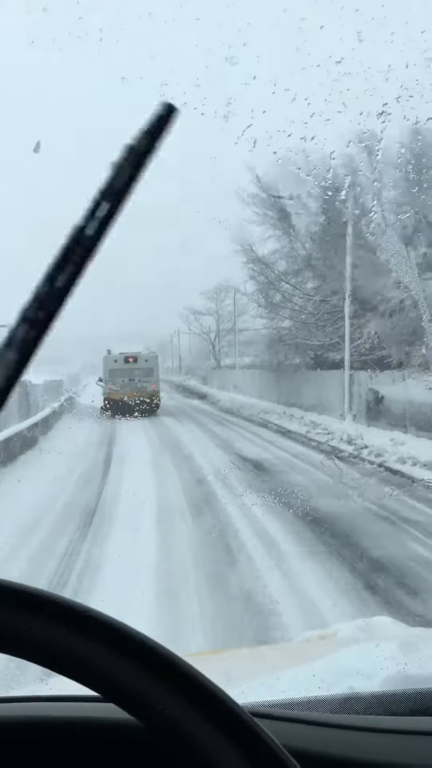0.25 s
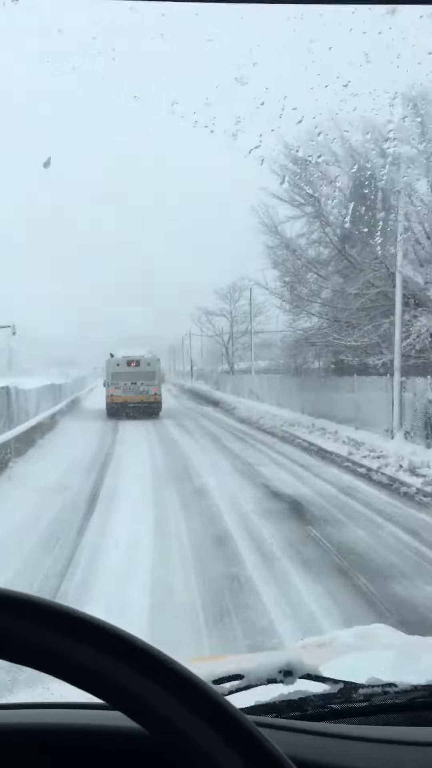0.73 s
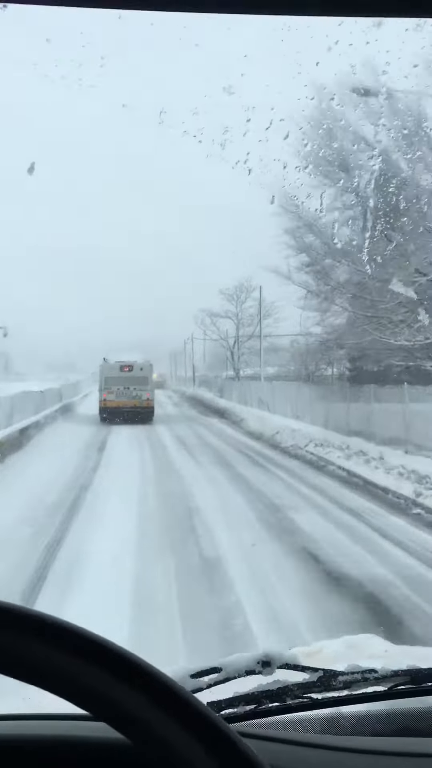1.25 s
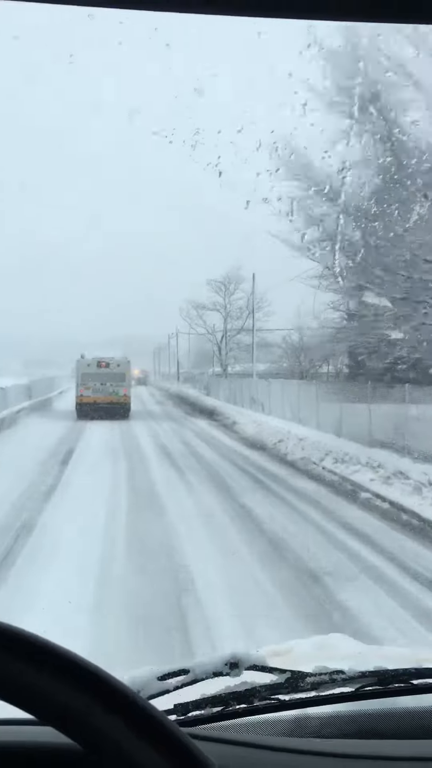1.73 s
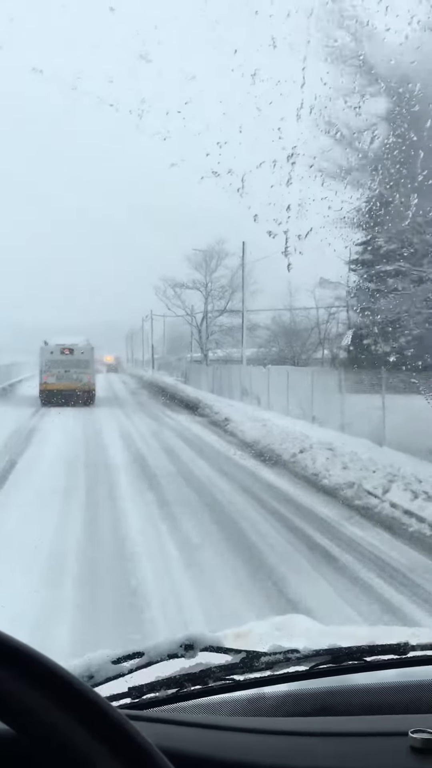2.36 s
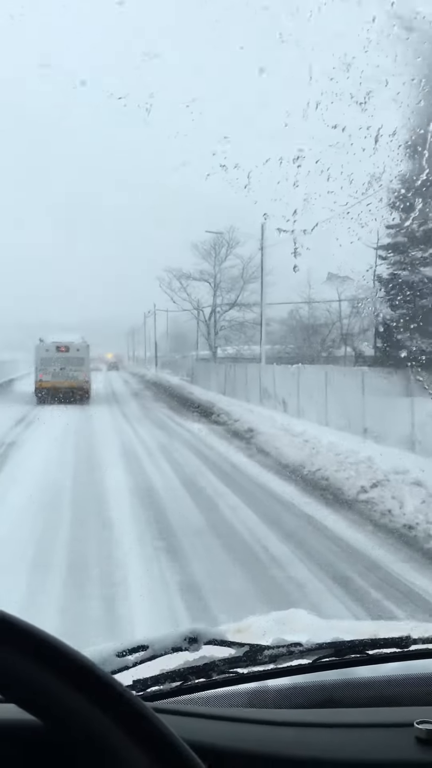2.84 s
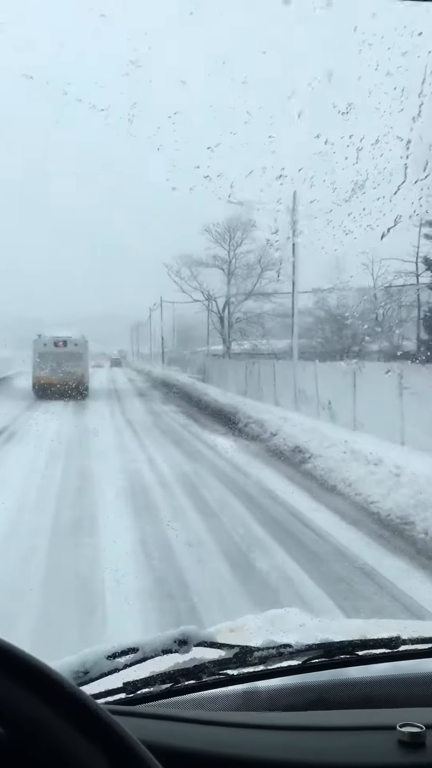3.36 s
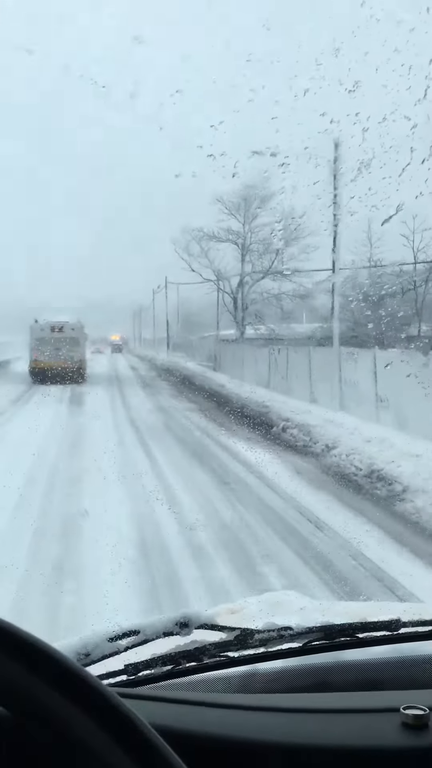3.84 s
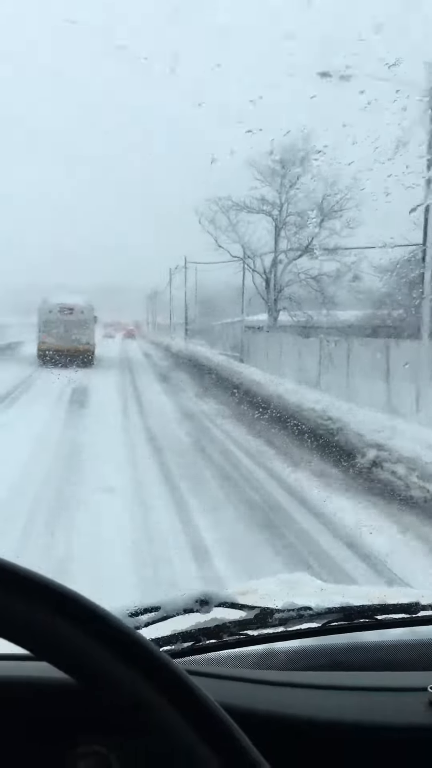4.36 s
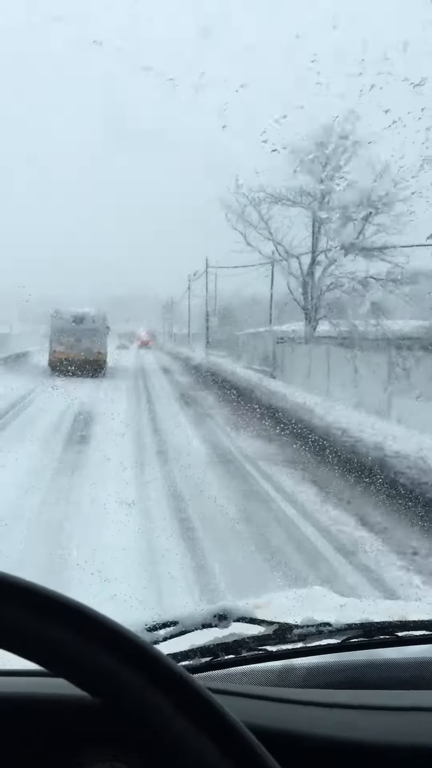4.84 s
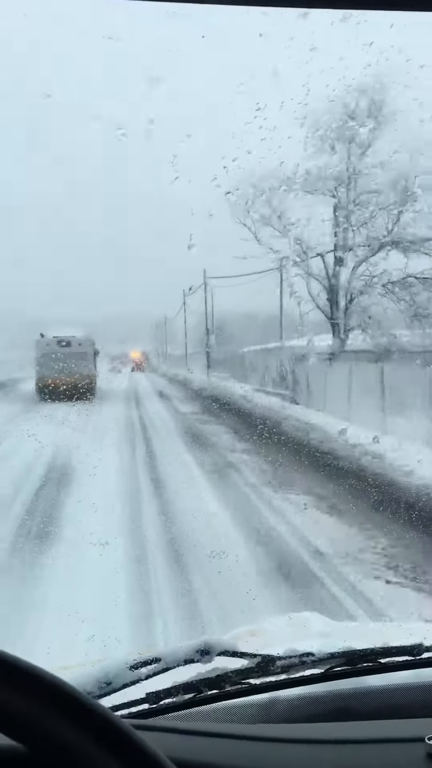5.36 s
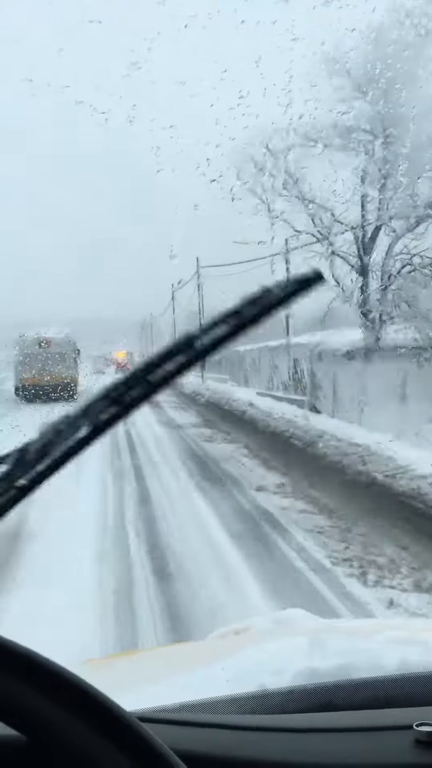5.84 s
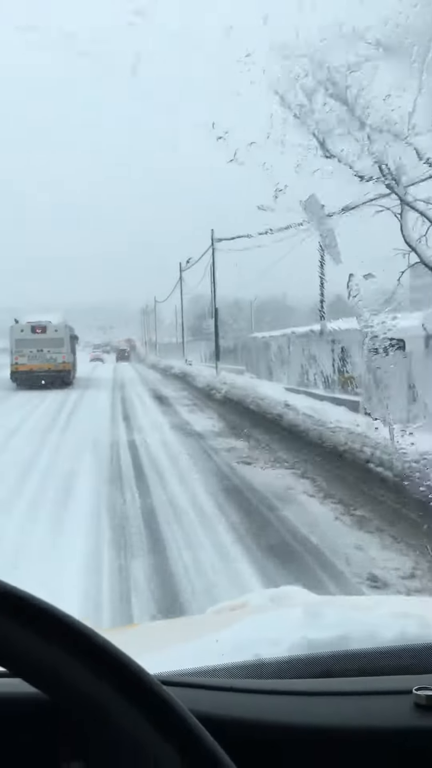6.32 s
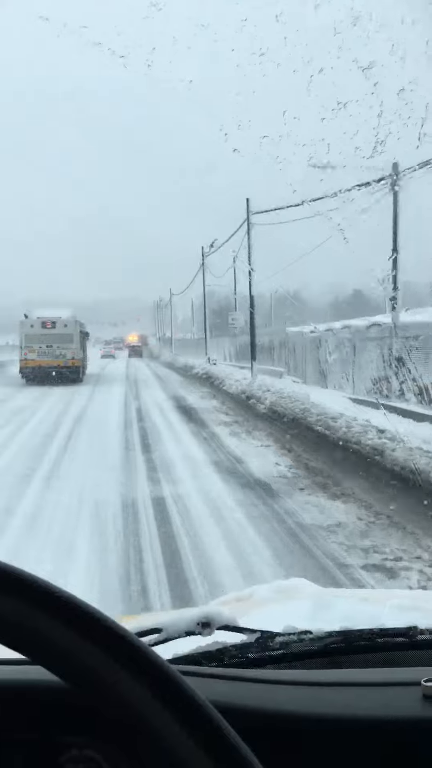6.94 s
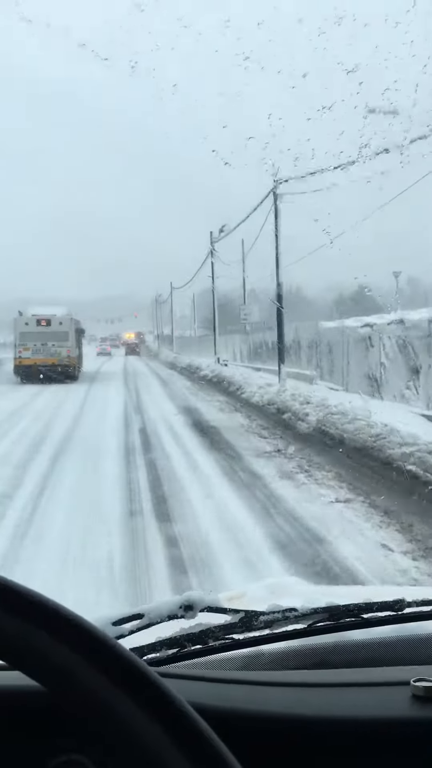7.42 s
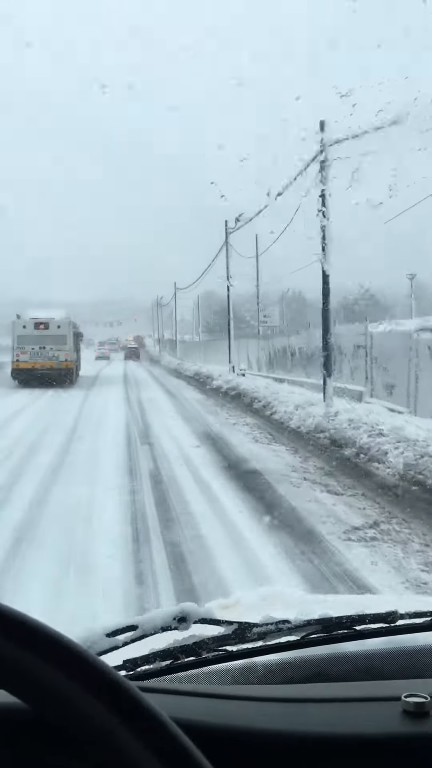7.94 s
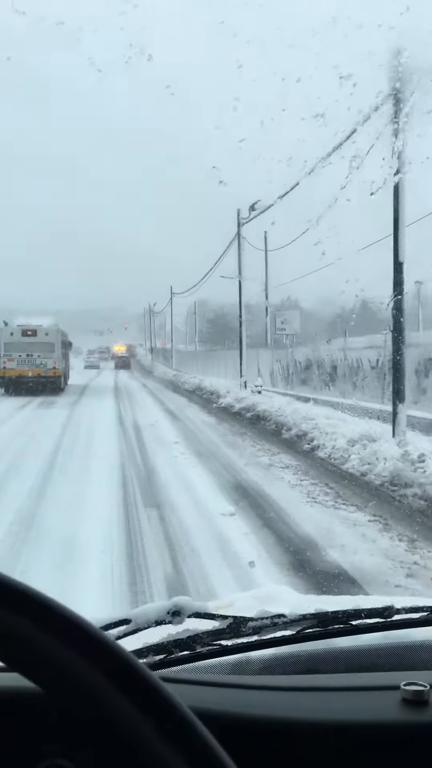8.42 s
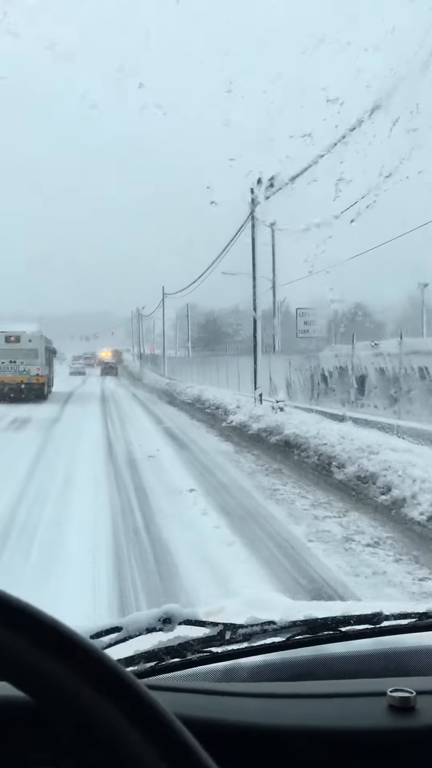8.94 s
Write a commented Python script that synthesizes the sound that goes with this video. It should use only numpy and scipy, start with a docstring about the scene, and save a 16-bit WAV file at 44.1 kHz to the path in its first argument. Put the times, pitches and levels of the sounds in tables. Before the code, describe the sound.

Close, enclosed mono cabin sound: low engine drone, rolling rumble over snow ruts, gentle intake hiss and vent air. A faint wiper stroke opens. Engine pitch rises gradually, with a thin whistling tone near the middle, then lowers as the car coasts. Wiper swishes and soft underfloor thumps crowd the later part before a couple of thuds and a renewed low hum.

```python
"""Six-cylinder car on a snowy road, cabin

The engine booms as a sine at its firing rate, joined by sine orders that cabin and panel resonances lift.
It pulls a little, coasts and picks up again. Shaped noise makes the tyre rumble, intake air and heater.
Narrow noise bands and a sine whistle with the intake; the drive line whines while coasting.
The wipers make strokes of swish and motor noise; damped noise bursts make trim ticks and dull thuds."""
import sys
import numpy as np
from scipy import signal
from scipy.fft import rfft, irfft, next_fast_len
from scipy.io import wavfile
from scipy.ndimage import uniform_filter1d

SR = 44100
rng = np.random.default_rng(int(sys.argv[2]) if len(sys.argv) > 2 else 0)


def generate_wav(signal):
    """Clip the signal to [-1, 1] and save it as 16-bit WAV at the path in sys.argv[1]."""
    frames = np.transpose(np.atleast_2d(signal))
    scaled = np.clip(frames, -1, 1) * 32767
    pcm = np.round(scaled).astype(np.int16)
    wavfile.write(sys.argv[1], SR, pcm)


N = 404838
TIME_S = np.arange(N) / SR
FREQ_HZ = np.maximum(np.arange(N // 2 + 1) * SR / N, 1)

# engine speed, also road speed in one gear: time_s, firing_hz
SPEED = [(0, 69.5), (1.3, 71.5), (2.1, 72.5), (3.1, 75.4), (4.6, 79.6), (5.25, 80.7), (6.1, 79.6),
         (7, 77.9), (8.05, 74.1), (8.6, 74.1), (9.18, 75.1)]
# driver pulls, coasts, picks up: time_s, boom_db, hiss_db
PEDAL = [(0, -17, -50.5), (1.2, -18, -48.5), (2.4, -18.5, -49), (3.2, -17, -48), (3.7, -14.5, -48.5),
         (4.5, -16, -47), (4.72, -17.5, -47.5), (4.88, -12.5, -46.5), (5.05, -16, -47.5),
         (5.35, -16.5, -47), (5.55, -21.5, -50), (6.15, -23.5, -52.5), (6.32, -30, -53.5),
         (6.45, -23, -53.5), (6.8, -24, -54.5), (7.3, -29.5, -59), (7.95, -32, -57.5), (8.3, -22, -55),
         (8.8, -19, -50.5), (9.18, -18.5, -47.5)]
CRUISE_HZ, CRUISE_BOOM_DB, CRUISE_HISS_DB = 75, -18, -49

# engine orders before resonance lift: order (multiple of the six-firing cycle), level_db, boom_share (dB per dB)
ENGINE_ORDERS = [(2, -47, .5), (3, -44, .4), (7, -37, .3), (8, -38, .4), (9, -34, -.4), (10, -46, .1),
                 (11, -45.5, -.1), (12, -46.5, -.35), (13, -57, -.3), (14, -56, .3), (15, -52, .1),
                 (17, -58.5, .3), (18, -52.5, 0), (20, -57, .4), (21, -56, .3), (22, -53, .7),
                 (23, -56.5, -.15), (24, -58, -.1), (27, -59.5, .5), (30, -60, .4), (32, -59, .5),
                 (34, -59, .7), (38, -59.5, .3), (42, -63, .1), (46, -64, .3), (48, -61.5, .4),
                 (57, -63, .2), (63, -64, .3), (65, -63, .3), (71, -65, .4), (80, -69, 0)]
ORDER_WAVER_DB, ORDER_WAVER_TURNS = 1.3, .04
# cabin air modes: centre_hz, width_hz, peak_db
CABIN_MODES = [(127, 8, 7), (157, 12, 4), (177, 10, 9), (200, 14, 12), (211, 10, 10), (282, 30, 7)]
# body panel resonances: centre_hz, width_hz, peak_db
PANEL_MODES = [(352.5, 23, 3.5), (416, 17, 4.5), (552, 16, 5), (738, 60, 2.5), (856, 31, 6),
               (1062, 27, 6.5), (1420, 170, 3)]
# valve and belt clatter spectrum: freq_hz, relative_db
CLATTER_COLOUR = [(200, -13), (320, -2), (450, -8), (620, -1.5), (850, 0.5), (960, -4), (1400, -7),
                  (2200, -16.5), (4000, -22)]
CLATTER_DB, CLATTER_DB_PER_BOOM_DB = -47, 0.24

# body rumble spectrum: freq_hz, relative_db
RUMBLE_COLOUR = [(12, -28), (22, -15), (30, -16.5), (42, 1.5), (58, -5), (75, -6.5), (100, -16.5),
                 (160, -41)]
# body drone spectrum: freq_hz, relative_db
DRONE_COLOUR = [(50, -6), (80, 5), (112, -1.5), (135, -3.5), (165, -26), (220, -30.5), (350, -53)]
# snow churning in the wheel wells, spectrum: freq_hz, relative_db
CHURN_COLOUR = [(120, 5.5), (175, -4.5), (240, -3), (290, -2), (340, -10.5), (450, -22.5), (800, -36)]
# tread roar spectrum before the panels: freq_hz, relative_db
TYRE_COLOUR = [(200, 0), (330, -0.5), (480, 2), (600, -1), (800, -0.5), (950, -4.5), (1200, -5.5),
               (1600, -11), (2200, -12.5), (3000, -25), (7000, -40)]
# levels at cruise outside ruts; slopes per Hz of firing rate
RUMBLE_DB, RUMBLE_DB_PER_HZ = -35, 0.63
DRONE_DB, DRONE_DB_PER_HZ = -31, .5
CHURN_DB, ROAR_DB, ROAR_DB_PER_BOOM_DB = -38, -42.5, 0.19
# snow ruts and ridges: start_s, length_s, rumble_db, drone_db, churn_db
RUTS = [(0, 0.42, -35, -31, -38.5), (.87, 0.13, -26, -40, -37), (1.1, 0.11, -28, -27, -44),
        (2.6, 0.37, -47, -47, -33), (3.6, 0.28, -25, -34, -55), (4.03, 0.33, -24, -35, -42),
        (4.76, 0.17, -27.5, -21.5, -45), (5.12, 0.26, -24, -25, -52), (5.6, 0.14, -40, -28, -37),
        (6.95, 0.25, -46, -31, -38), (7.84, 0.36, -36, -29.5, -51)]
RUT_ATTACK_S, RUT_RELEASE_S = 0.019, 0.06

# intake hiss spectrum: freq_hz, relative_db
HISS_COLOUR = [(800, -15), (1400, 2.5), (2000, 0.5), (2950, -5), (3450, 0), (4100, 0.5), (4700, -0.5),
               (5400, -6), (5800, -8), (7200, -10), (8000, -15.5), (8700, -15.5), (10000, -20),
               (11000, -21.5)]
# duct rings: centre_hz, width_hz, relative_db, rise_db_per_hz (of firing rate)
AIR_RINGS = [(2778, 25, -17.5, -.15), (4035, 100, -13, -.3), (4865, 40, -19, .1), (5090, 60, -21, -.6),
             (5480, 50, -19.5, -.7)]
# rush level before its speed window; window centre and width in firing rate
RUSH_DB, RUSH_DB_PER_HISS_DB, RUSH_AT_HZ, RUSH_RANGE_HZ = -56, 4.1, 73.5, 5.2
# thin edge tone: time_s, pitch_hz, level_db
WHISTLE = [(.4, 10150, -83), (1.15, 10600, -83), (1.3, 10760, -73), (1.65, 10800, -74), (2, 10520, -82),
           (2.6, 10650, -81), (2.85, 11100, -71), (3.2, 11650, -74), (3.6, 12050, -80), (4.3, 12550, -79),
           (5.1, 12720, -78), (5.42, 12250, -83), (5.6, 11880, -74), (6.1, 10900, -80), (6.5, 10400, -100)]
WHISTLE_WIDTH_HZ = 170
# singing tone: start_s, length_s, level_db
SING_SPELLS = [(4.7, 1.66, -63), (4.74, .19, -55), (4.97, .48, -63), (5.52, .25, -68), (5.67, .055, -55),
               (5.94, .1, -65), (6.19, .065, -57)]
SING_HZ, SING_HZ_PER_HZ = 3700, 26.5  # pitch at cruise; slope per Hz of firing rate
SING_ATTACK_S, SING_RELEASE_S = 0.037, 0.028

# heater vent spectrum: freq_hz, relative_db
VENT_COLOUR = [(1200, -11), (2200, -6.5), (3000, -5), (3600, -2), (4100, -2), (5000, -12), (5700, -8),
               (6200, -7.5), (7000, -16), (7800, -18), (9600, -17.5), (10500, -24.5), (12000, -20),
               (15500, -20)]
# wiper strokes: start_s, length_s, blade_db, motor_db
WIPES = [(0.041, 0.78, -67, -56), (5.5, 0.42, -51, -71), (6.301, 0.575, -53, -52)]
WIPER_HZ, WIPER_RISE_HZ_PER_S, WIPER_WIDTH_HZ = 682, 90, 45
# wiper arms and slush under the floor: time_s, level_db, centre_hz, width_hz, t60_s
THUDS = [(.62, -39, 230, 140, .35), (5.195, -33, 270, 100, .18), (5.585, -30, 210, 110, .2),
         (5.65, -31, 300, 160, .18), (5.712, -29, 340, 190, .15), (5.755, -31, 250, 110, .18),
         (6.085, -30, 250, 120, .16), (6.228, -26, 250, 140, .16), (6.312, -37, 480, 700, .13),
         (6.33, -30, 215, 80, .2), (6.67, -32, 200, 140, .15), (6.77, -35.5, 370, 120, .25),
         (6.80, -41, 560, 300, .15), (6.825, -33, 360, 100, .18), (6.922, -24, 230, 120, .16),
         (7.055, -32, 300, 130, .14), (7.475, -39, 360, 90, .2), (8.06, -27, 150, 120, .3),
         (8.095, -33, 270, 120, .25)]
# trim ticks: time_s, level_db, centre_hz, width_hz, t60_s
TICKS = [(3.135, -58, 9000, 2500, .08), (3.6025, -29, 2000, 3900, .045), (3.609, -37, 1100, 2200, .08),
         (5.180, -46.5, 8000, 7500, .14), (5.684, -46, 6500, 1500, .12), (7.307, -56, 9000, 2000, .11),
         (7.41, -59, 10500, 5000, .15), (8.066, -47.5, 12000, 5000, .12)]
# drive-line whine: order (multiple of the six-firing cycle), level_db at full coast
GEAR_LINES = [(21.5, -48.5), (58, -58.5), (65.6, -53.5), (71.9, -56.5)]
GEAR_WIDTH_HZ = 9
TOP_HZ = 15750


def undb(db):
    """Decibels to gain."""
    return 10 ** (np.asarray(db) / 20)


def unit(x):
    """Scale to rms 1."""
    return x / np.sqrt(np.mean(x ** 2))


def curves(table):
    """Interpolate each column of timed rows at every sample."""
    time_s, *columns = np.transpose(table)
    return [np.interp(TIME_S, time_s, column) for column in columns]


def swells(table, attack_s, release_s):
    """Rows (start, length, dB, ..) rise, hold and fade; one summed gain curve per dB column."""
    start_s, length_s, *levels_db = np.transpose(table)
    shapes = []
    for start, length in zip(start_s, length_s):
        corners_s = np.cumsum([start, attack_s, max(length - attack_s, 0), release_s])
        shapes.append(np.interp(TIME_S, corners_s, [0, 1, 1, 0]))
    return [undb(db) @ np.array(shapes) for db in levels_db]


def walk(rate_hz):
    """Random wander, spread near 1, linear between rate_hz points per second."""
    steps = rng.standard_normal(1024)
    return 1.6 * np.interp(TIME_S * rate_hz, np.arange(len(steps)), steps)


def bell(hz, centre_hz, width_hz):
    """Resonance curve, 1 at its centre."""
    return 1 / (1 + (2 * (hz - centre_hz) / width_hz) ** 2)


def colour(points):
    """Gain of a spectrum of (Hz, dB) points, rolled off beyond both ends."""
    hz, db = np.transpose(points)
    gain = undb(np.interp(np.log(FREQ_HZ), np.log(hz), db))
    return gain * np.minimum(FREQ_HZ / hz[0], 1) * np.minimum(hz[-1] / FREQ_HZ, 1) ** 2


def panels():
    """Body panel gain per frequency."""
    return undb(sum(db * bell(FREQ_HZ, hz, width_hz) for hz, width_hz, db in PANEL_MODES))


def shape(x, gain):
    """Filter by a gain per FREQ_HZ; rms 1."""
    size = next_fast_len(N, True)
    bins_hz = np.arange(size // 2 + 1) * SR / size
    return unit(irfft(rfft(x, size) * np.interp(bins_hz, FREQ_HZ, gain), size)[:N])


def noise(gain):
    """Noise of rms 1 with the given gain per frequency."""
    return shape(rng.standard_normal(N), gain)


def even(x, size=SR // 8):
    """Take out slow chance swells; quick flutter stays."""
    power = uniform_filter1d(uniform_filter1d(x ** 2, size), size)
    return x / np.sqrt(power)


def tone(hz):
    """Sine of rms 1 on a moving pitch."""
    return np.sqrt(2) * np.sin(2 * np.pi * np.cumsum(hz) / SR)


def airy(hz, width_hz):
    """Narrow noise band on a moving pitch."""
    return noise(bell(FREQ_HZ, 0, width_hz)) * tone(hz)


def engine(phase, firing_hz, boom_db):
    """Firing rate booms; unequal cylinders add orders that swell on crossing cabin and panel modes."""
    load_db = boom_db - CRUISE_BOOM_DB
    rates_hz = np.linspace(firing_hz.min(), firing_hz.max(), 64)
    out = undb(boom_db + 0.35 * walk(19)) * np.sin(2 * np.pi * phase)
    for order, db, boom_share in ENGINE_ORDERS:
        ratio = order / 6
        lift_db = sum(peak_db * bell(ratio * rates_hz, hz, width_hz)
                      for hz, width_hz, peak_db in CABIN_MODES + PANEL_MODES)
        turns = ratio * phase + rng.random() + ORDER_WAVER_TURNS * walk(11)
        level_db = db + np.interp(firing_hz, rates_hz, lift_db) + boom_share * load_db
        level_db = level_db + ORDER_WAVER_DB * walk(8)
        out = out + undb(level_db) * np.sin(2 * np.pi * turns)
    return np.sqrt(2) * out


def clatter(phase, boom_db):
    """Valves and belts repeat a slowly changing noise pattern every six firings."""
    cycle = phase / 6 % 1
    patterns = rng.standard_normal((3, 2048))
    out = sum(walk(0.99) * np.interp(cycle, np.linspace(0, 1, len(p)), p) for p in patterns)
    out = out / np.sqrt(uniform_filter1d(out ** 2, size=8000))
    level_db = CLATTER_DB + CLATTER_DB_PER_BOOM_DB * (boom_db - CRUISE_BOOM_DB)
    return shape(out, colour(CLATTER_COLOUR) * panels()) * undb(level_db)


def road(firing_hz, boom_db):
    """Body rumbles and drones with speed and ruts, snow churns, treads roar through the panels."""
    faster_hz = firing_hz - CRUISE_HZ
    jolt, shudder, spray = swells(RUTS, RUT_ATTACK_S, RUT_RELEASE_S)
    rumble_gain = np.hypot(undb(RUMBLE_DB + RUMBLE_DB_PER_HZ * faster_hz), jolt)
    rumble = even(noise(colour(RUMBLE_COLOUR))) * rumble_gain
    drone_gain = np.hypot(undb(DRONE_DB + DRONE_DB_PER_HZ * faster_hz), shudder)
    drone = even(noise(colour(DRONE_COLOUR))) * drone_gain
    churn = even(noise(colour(CHURN_COLOUR))) * np.hypot(undb(CHURN_DB), spray)
    roar_db = ROAR_DB + ROAR_DB_PER_BOOM_DB * (boom_db - CRUISE_BOOM_DB) + .8 * walk(16)
    roar = even(noise(colour(TYRE_COLOUR) * panels())) * undb(roar_db)
    return rumble + drone + churn + roar


def intake(phase, firing_hz, hiss_db):
    """Throttle air hisses, pulsing at the firing rate, and rings in ducts; a rush peaks at one engine speed."""
    pulsing = 1 + 0.11 * np.cos(2 * np.pi * phase)
    flutter = undb(.8 * walk(25))
    hiss = noise(colour(HISS_COLOUR)) * pulsing * undb(-0.5)
    rings = 0
    for hz, width_hz, db, rise_db_per_hz in AIR_RINGS:
        ring_db = db + rise_db_per_hz * (firing_hz - CRUISE_HZ) + walk(20)
        rings = rings + airy(hz * (1 + .002 * walk(3)), width_hz) * undb(ring_db)
    rush_db = RUSH_DB + RUSH_DB_PER_HISS_DB * (hiss_db - CRUISE_HISS_DB) + 1.5 * walk(16)
    rush = noise(bell(FREQ_HZ, 4950, 1100) ** 2) * undb(rush_db)
    rush = rush * bell(firing_hz, RUSH_AT_HZ, RUSH_RANGE_HZ)
    return flutter * ((hiss + rings) * undb(hiss_db) + rush)


def whistles(firing_hz):
    """An airy edge tone glides in pitch; a lower sine sings in spells, its pitch tied to engine speed."""
    hz, db = curves(WHISTLE)
    edge_tone = airy(hz, WHISTLE_WIDTH_HZ) * undb(db)
    spells, = swells(SING_SPELLS, SING_ATTACK_S, SING_RELEASE_S)
    sing_hz = SING_HZ + SING_HZ_PER_HZ * (firing_hz - CRUISE_HZ) + 12 * walk(110)
    return edge_tone + tone(sing_hz) * spells * undb(1.5 * walk(40))


def heater():
    """Demister air: coloured noise, nearly steady."""
    return noise(colour(VENT_COLOUR)) * undb(-53.0 + 0.36 * walk(21))


def wipers():
    """Blades swish over wet glass; motor bands an octave apart rise in pitch from each stroke's start."""
    blade, motor = swells(WIPES, attack_s=0.19, release_s=0.079)
    starts_s = np.array(WIPES)[:, 0]
    stroke = np.maximum(np.searchsorted(starts_s, TIME_S) - 1, 0)
    hz = WIPER_HZ + WIPER_RISE_HZ_PER_S * (TIME_S - starts_s[stroke])
    whir = airy(hz, WIPER_WIDTH_HZ) + undb(2.5) * airy(hz / 2, WIPER_WIDTH_HZ / 2)
    return blade * noise(bell(FREQ_HZ, 1570, 1500)) + motor * whir


def knocks(table, attack_s, grain_db):
    """Each blow is a damped noise burst in one resonance, roughened by grain_db."""
    size = 16384
    out, age_s = np.zeros(N + size), np.arange(size) / SR
    bins_hz = np.fft.rfftfreq(size, 1 / SR)
    for time_s, db, hz, width_hz, t60_s in table:
        burst = irfft(rfft(rng.standard_normal(size)) * bell(bins_hz, hz, width_hz))
        ring = even(burst, size=700)
        grain = np.interp(age_s * 900, np.arange(400), rng.standard_normal(400))
        fade = np.exp(-np.log(1000) * age_s / t60_s) * np.minimum(age_s / attack_s, 1)
        start = int(time_s * SR)
        out[start:start + size] += ring * fade * undb(db + grain_db * grain)
    return out[:N]


def gears(firing_hz, boom_db):
    """Drive line whines roughly, in narrow noise bands tied to engine speed, while coasting."""
    coasting = np.clip((CRUISE_BOOM_DB - boom_db - 3) / 7, 0, 1)
    lines = sum(even(airy(order * firing_hz / 6, GEAR_WIDTH_HZ)) * undb(db)
                for order, db in GEAR_LINES)
    return coasting * lines


def scene():
    """Sum of all sources at the driver's seat, one channel."""
    firing_hz, = curves(SPEED)
    boom_db, hiss_db = curves(PEDAL)
    phase = np.cumsum(firing_hz) / SR  # turns; one per firing
    motor = engine(phase, firing_hz, boom_db) + clatter(phase, boom_db)
    air = intake(phase, firing_hz, hiss_db) + whistles(firing_hz) + heater()
    thuds = knocks(THUDS, attack_s=0.0075, grain_db=0.0)
    ticks = knocks(TICKS, attack_s=0.0052, grain_db=6.5)
    rolling = road(firing_hz, boom_db) + gears(firing_hz, boom_db)
    return (motor + rolling + air + wipers() + thuds + ticks)[None]


def record(dry):
    """Steep elliptic low-pass at TOP_HZ."""
    return signal.sosfilt(signal.ellip(10, .1, 80, TOP_HZ, fs=SR, output="sos"), dry)


dry = scene()
out = record(dry)
generate_wav(out)
```